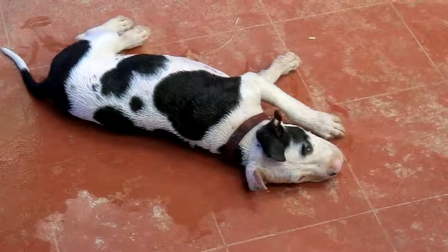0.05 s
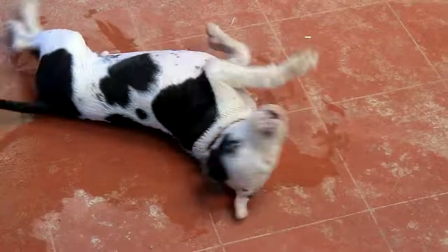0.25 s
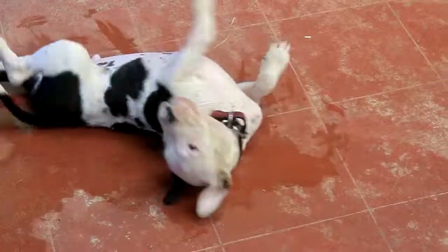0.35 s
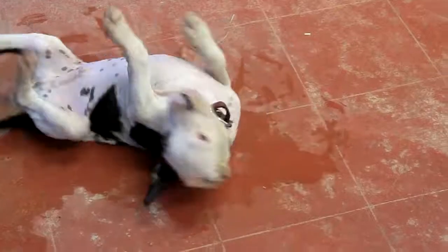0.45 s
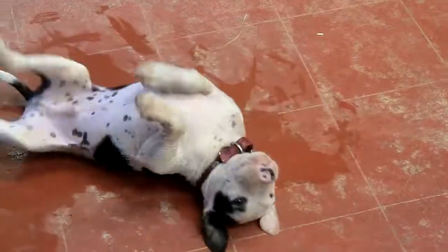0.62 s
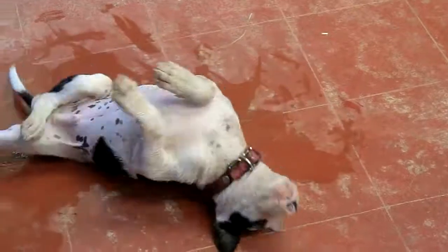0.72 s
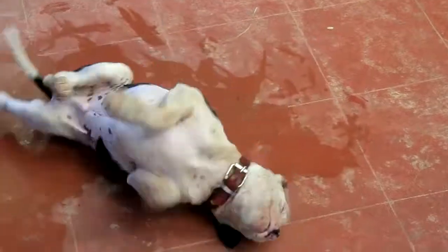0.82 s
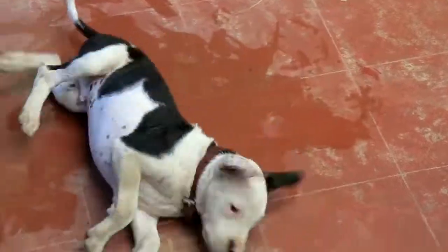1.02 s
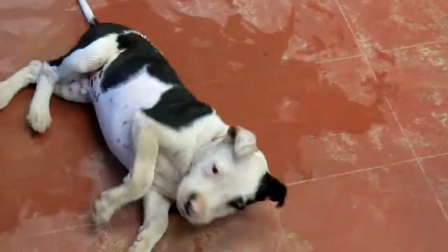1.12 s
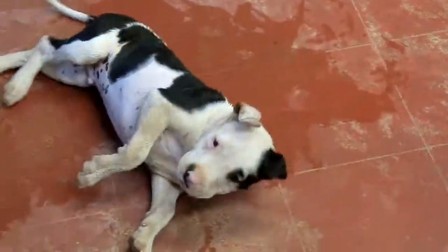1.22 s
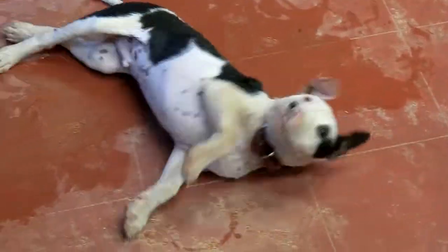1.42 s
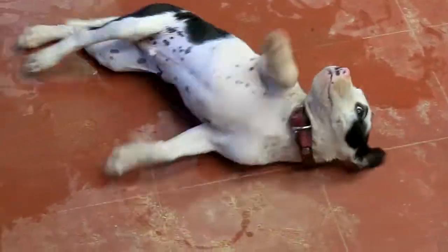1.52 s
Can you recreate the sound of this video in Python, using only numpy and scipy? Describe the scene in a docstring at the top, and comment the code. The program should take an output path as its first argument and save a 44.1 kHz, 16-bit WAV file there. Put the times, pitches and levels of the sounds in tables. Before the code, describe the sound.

A single rough bark, loud enough to make the microphone click, echoes indoors. A much quieter puppy grumble follows, rising into a small moan, as its coat brushes the tiled floor and its collar ticks over faint hiss.

```python
"""A dog gives one short, loud, rough and rasping bark that overloads the microphone with a brief click.
The hard-walled room throws it back and rings. Then a puppy rolling on the tiles grumbles softly:
uneven throat pulses ring its chest and muzzle, a low growl that breaks into a rattle and rises to a
small moan. Its coat brushes the floor, its collar ticks and its body thuds, over faint hiss and rumble."""
import sys
import numpy as np
from scipy import signal
from scipy.fft import rfft, irfft
from scipy.io import wavfile
from scipy.ndimage import uniform_filter1d

SR = 44100
rng = np.random.default_rng(int(sys.argv[2]) if len(sys.argv) > 2 else 0)


def log_audio(samples):
    """Write samples as a 16-bit WAV file to the path given in sys.argv[1]."""
    # one column per channel
    frames = np.atleast_2d(samples).T
    # limit to full scale, then quantise
    limited = np.clip(frames, -1, 1)
    pcm = np.round(limited * 32767).astype(np.int16)
    wavfile.write(sys.argv[1], SR, pcm)


N = 68355
T = np.arange(N) / SR


def from_db(db):
    """Decibels to gain."""
    return 10 ** (np.asarray(db) / 20)


def rms_one(x):
    """Scale to unit power."""
    return x / np.sqrt(np.mean(x ** 2) + 1e-20)


def in_time(rows):
    """Interpolate each column at every sample; the first column is time in seconds."""
    times_s, *columns = np.transpose(rows)
    return [np.interp(T, times_s, column) for column in columns]


def at_hz(points, hz):
    """Read a spectrum on a log-frequency axis."""
    points_hz, values = np.transpose(points)
    return np.interp(np.log(hz + 1e-9), np.log(points_hz), values)


def cut(x, hz, kind, order=2):
    """Butterworth filter."""
    sos = signal.butter(order, np.clip(hz, 10, .48 * SR), kind, fs=SR, output="sos")
    return signal.sosfilt(sos, x + 1e-18)


def noise(colour):
    """Noise of a given colour, rms 1."""
    gain = from_db(at_hz(colour, np.fft.rfftfreq(N, 1 / SR)))
    return rms_one(irfft(rfft(rng.standard_normal(N)) * gain, N))


def wobble(hz):
    """Random wavering up to a given rate, rms 1."""
    return rms_one(cut(rng.standard_normal(N), hz, "low"))


def decay(start_s, decay_s):
    """Envelope: instant attack, exponential fall."""
    return (T >= start_s) * np.exp(-np.abs(T - start_s) / decay_s)


def resonate(x, modes):
    """Parallel resonances with alternating signs."""
    out = 0
    for k, (hz, width_hz, db) in enumerate(modes):
        r = np.exp(-np.pi * width_hz / SR)
        feedback = [1, -2 * r * np.cos(2 * np.pi * hz / SR), r * r]
        out += (-1) ** k * from_db(db) * (1 - r * r) / 2 * signal.lfilter([1, 0, -1], feedback, x)
    return out


def moving_resonance(x, hz, width_hz):
    """One resonance whose centre glides, stepped in short blocks."""
    out, state = np.zeros(N), np.zeros(2)
    r = np.exp(-np.pi * width_hz / SR)
    for i in range(0, N, 128):
        block = slice(i, i + 128)
        feedback = [1, -2 * r * np.cos(2 * np.pi * hz[i] / SR), r * r]
        out[block], state = signal.lfilter([1, 0, -1], feedback, x[block], zi=state)
    return out * (1 - r * r) / 2


def background():
    """Hiss, louder before the bark than after, over low room rumble."""
    # Noise spectra. Each row: frequency in Hz, relative density in dB.
    hiss_colour = [(30, -12.5), (110, -3.5), (300, -12.5), (500, -4.5), (700, 4.5), (1400, -1),
                   (2500, -0.5), (4000, -5.5), (8000, -8), (15500, -11)]
    rumble_colour = [(25, -1), (60, -16), (130, -1.5), (400, -8), (900, -15), (3000, -40), (16000, -47)]
    # Hiss envelope. Each row: time in seconds, level in dB.
    hiss_curve = [(.110, -120), (.116, -56.5), (.135, -54.5), (.155, -50.5), (.185, -56.5), (.30, -59),
                  (.40, -72), (1.55, -69.5)]
    hiss_db, = in_time(hiss_curve)
    return from_db(hiss_db) * noise(hiss_colour) + from_db(-64) * noise(rumble_colour)


def bark():
    """A soft whine leaps to a loud, rough tone, rasping each cycle, pushes again and falls away."""
    # Voice contour. Each row: time in seconds, pitch in Hz, level in dB, roughness.
    contour = [(.200, 530, -61, 0.42), (.208, 565, -46, 0.37), (.224, 611, -42, 0.2),
               (.2350, 599.8, -26.5, 0.2), (.2392, 848, -7, 0.54), (.244, 855, -8, 0.65),
               (.251, 892.7, -15, 0.6), (.257, 861.7, -6, 0.1), (.262, 810.6, -11.5, 0.18),
               (.269, 785, -33.5, 1.1), (.279, 752.8, -32.5, 0.9), (.286, 818, -11.5, 0.1),
               (.294, 777.5, -19.5, 0.42), (.304, 697, -36, .5), (.325, 465.3, -48, .2),
               (.342, 310, -49, .1), (.385, 242, -51, 0.2)]
    # Throat and open mouth. Each row: frequency in Hz, harmonic gain in dB.
    mouth = [(280, -5), (560, 0.5), (850, -1.5), (1200, -11), (1650, -15.5), (2000, -14), (2450, -14.5),
             (2850, -27.5), (3500, -25.5), (4100, -33.5), (4800, -59.5), (15000, -53)]
    # Rasp spectrum. Each row: frequency in Hz, relative density in dB.
    rasp_colour = [(200, -53.5), (480, -33), (750, -2), (1100, 2), (1600, 3), (2000, -6.5), (2400, 5.5),
                   (2900, -10.5), (3800, -4.5), (4700, -35), (6800, -36), (8200, -33.5), (10000, -37.5),
                   (15000, -31)]
    jitter, rasp_db = 0.022, -2.5
    hz, db, rough = in_time(contour)
    phase = 2 * np.pi * np.cumsum(hz * (1 + jitter * rough * wobble(hz=500))) / SR
    tone = sum(from_db(at_hz(mouth, k * hz)) * np.cos(k * phase) for k in range(1, 13)) * np.sqrt(2)
    rasp = from_db(rasp_db) * rough * noise(rasp_colour) * (1 + 0.2 * np.cos(phase))
    voice = cut(from_db(db) * (tone + rasp), 258, "high", order=4)
    return voice * (T > contour[0][0]) * (T < contour[-1][0])


def room(x):
    """Two dull wall echoes and a diffuse ring that dies band by band."""
    # Wall echoes. Each row: delay in seconds, gain in dB.
    walls = [(.030, -18.5), (0.0453, -15.5)]
    # Diffuse ring. Each row: frequency in Hz, gain in dB, T60 in seconds.
    ring = [(150, -11, 0.65), (500, -8, .42), (756, -7.5, 0.82), (910, -8.5, 0.24), (1570, 1.5, 0.42),
            (2560, -9.5, .26), (4060, -9, 0.35), (8000, 4.5, .3), (15000, -5.5, .27)]
    gain_db, t60_s = np.array(ring)[:, :2], np.array(ring)[:, ::2]
    build_s, edges_hz = .012, np.geomspace(100, 17000, 14)
    white, bins_hz = rfft(rng.standard_normal(N)), np.fft.rfftfreq(N, 1 / SR)
    tail = 0
    for low, high in zip(edges_hz, edges_hz[1:]):
        hz = np.sqrt(low * high)
        envelope = from_db(-60 * T / at_hz(t60_s, hz)) * (1 - np.exp(-T / build_s))
        band = irfft(white * ((bins_hz >= low) & (bins_hz < high)), N) * envelope
        tail += from_db(at_hz(gain_db, hz)) * rms_one(band) * np.sqrt(2 * (high - low) / SR / N)
    dull = cut(x, 1200, "low")
    echoes = sum(from_db(db) * np.interp(T - delay_s, T, dull) for delay_s, db in walls)
    return echoes + signal.fftconvolve(x, tail)[:N]


def overload_click():
    """Microphone overload as the bark turns loud: a brief broadband noise burst."""
    # Click spectrum. Each row: frequency in Hz, relative density in dB.
    colour = [(30, 2), (170, 0), (350, -19.5), (900, -5), (5000, 1), (7500, -2), (9000, -10.5),
              (16000, -10)]
    peak_s, half_length_s = .2405, .0016
    return from_db(-27) * np.exp(-((T - peak_s) / half_length_s) ** 2 / 2) * noise(colour)


def growl():
    """Uneven pulses, strong and weak in turn, ring throat and chest and puff air through the muzzle."""
    # Puppy's voice. Each row: time in seconds, pitch in Hz, level in dB, roughness, weakening of every
    # second pulse (0-1), throat resonance in Hz, relative mouth opening in dB, brightness in dB.
    contour = [(.42, 118.8, -57, 0.41, 0.06, 470, 19.5, -8.5), (.485, 113.2, -50.5, 0.25, 0, 440, 8, -21),
               (.55, 98.28, -52.5, 0.6, 0.21, 303.4, -11.5, 5), (.70, 97.28, -55, 0.48, 0.01, 382, -13, 15),
               (.77, 91.7, -54.5, 0.43, .1, 343, -6, -20), (.80, 96.77, -62.5, 0.44, .2, 500, -14, 21),
               (.83, 104.9, -55, 0.29, 0.2, 572, -9.5, 11), (.88, 108.5, -51, 0.23, .1, 310.2, -0.5, 1),
               (.915, 118, -45.5, 0.64, 0.16, 500, 2.5, -15), (.97, 113.9, -51, 0.2, 0.83, 313, -4.5, 4),
               (1.06, 113.8, -53.5, 0.1, 0.93, 285, -4, 13), (1.165, 115.4, -56, 0.05, 0.6, 295, -2, 0.5),
               (1.185, 206.9, -53, 0.09, 0.17, 408.2, 2, 9), (1.212, 209, -53, 0, .02, 419.7, 10, -4),
               (1.24, 201.6, -46, 0.11, 0.6, 403.3, 5.5, -4.5), (1.268, 194.3, -52, .04, 0.03, 380, 5.5, 0),
               (1.295, 198, -53.5, 0.25, 1, 396, 11.5, -8.5), (1.33, 184.1, -49, 0.6, 0.7, 380, -2, 4),
               (1.365, 178, -55.5, 0.41, .5, 430, 11, -3.5), (1.40, 172.5, -50, 0.2, .3, 486, 7.5, 0),
               (1.49, 160.7, -60, 0.3, 0.15, 373, 3, -3.5), (1.55, 160, -95, 0.53, 0.1, 450, -35, 1)]
    # Resonance gliding with the jaw. Each row: time in seconds, centre in Hz.
    jaw_glide = [(.70, 2070), (.80, 2280), (.875, 3520), (.93, 4136), (1.01, 3950), (1.055, 2770),
                 (1.11, 2140), (1.27, 2046), (1.36, 3688), (1.41, 2500), (1.48, 2140)]
    # Body and airway resonances. Each row: centre in Hz, width in Hz, gain in dB.
    throat_modes = [(521.7, 150, -22.5)]
    chest_modes = [(103.66, 53, -8), (197.1, 45, -1.5)]
    lip_modes = [(792, 40, -7.5), (1040, 214, -12.5)]
    muzzle_modes = [(2120, 430, -23.5), (3270, 380, -25.5), (3890, 300, -28), (5130, 1500, -27.5)]
    jitter, puff_decay_s = 0.069, 0.0029
    hz, db, rough, weak, throat_hz, opening_db, bright_db = in_time(contour)
    jaw_hz, = in_time(jaw_glide)

    cycles = np.cumsum(hz * (1 + jitter * rough * wobble(hz=97))) / SR
    count = np.floor(cycles)
    alternation = 1 - np.clip(weak, 0, 1) * (count % 2)
    pulses = np.diff(count, prepend=0) * alternation * from_db(5 * rough * wobble(hz=150))
    air = rng.standard_normal(N) * np.exp(-2.5 * (cycles % 1)) * np.sqrt(5 * hz / SR)
    source = cut(pulses + from_db(3.5) * rough * air, 82.64, "high", order=3)
    puff_envelope = signal.lfilter([1], [1, -np.exp(-1 / (puff_decay_s * SR))], pulses + 1e-18)
    puffs = puff_envelope * rng.standard_normal(N) * np.sqrt(2 / (puff_decay_s * SR))
    airy = 0.63 * source + from_db(0.5) * np.sqrt(np.clip(rough + weak, 0, 1)) * puffs

    throat = moving_resonance(source, throat_hz, width_hz=122) - resonate(source, throat_modes)
    chest = cut(resonate(source, chest_modes) + throat, 588, "low", order=3)
    lips = cut(resonate(source, lip_modes), [754, 1400], "band")
    jaw = from_db(-20) * moving_resonance(airy, jaw_hz, width_hz=470)
    muzzle = cut(resonate(airy, muzzle_modes) + jaw, [1730, 6800], "band", order=3)
    voice = chest + from_db(opening_db - 8.5) * (lips + from_db(bright_db) * muzzle)
    chest_rms = np.sqrt(np.abs(uniform_filter1d(chest ** 2, size=1800)) + 1e-14)
    return from_db(db) * voice / chest_rms * (T > contour[0][0])


def coat():
    """Fur brushes the tiles in grainy swells."""
    # Each row: peak time in seconds, half length in seconds, band centre in Hz, level in dB.
    brushes = [(.46, 0.021, 9600, -67), (0.569, 0.1, 9060, -71.5), (0.715, 0.05, 9300, -79.5),
               (0.587, 0.047, 6560, -79.5), (0.882, 0.025, 3610, -65), (1.146, 0.067, 7600, -77),
               (1.33, .05, 11100, -75)]
    grain_db, half_band_octaves = 3, 0.18
    out = 0
    for peak_s, half_length_s, hz, db in brushes:
        grains = rng.standard_normal(N) * from_db(grain_db * wobble(hz=198.5))
        band_hz = hz * 2 ** (half_band_octaves * np.array([-1, 1]))
        swell = np.exp(-((T - peak_s) / half_length_s) ** 2 / 2)
        out += from_db(db) * swell * rms_one(cut(grains, band_hz, "band"))
    return out


def collar():
    """The collar ticks: short, bright noise bursts."""
    # Each row: start in seconds, level in dB.
    ticks = [(0.535, -72), (.870, -58.5), (0.881, -60)]
    # Tick spectrum. Each row: frequency in Hz, relative density in dB.
    colour = [(1500, -24), (4000, -16), (9000, 3), (16000, 2.5)]
    return sum(from_db(db) * decay(start_s, decay_s=0.004) * noise(colour) for start_s, db in ticks)


def thud():
    """A dull thud as the puppy flops over."""
    # Body on floor. Each row: start in seconds, level in dB.
    bumps = [(.555, -55)]
    # Thud spectrum. Each row: frequency in Hz, relative density in dB.
    colour = [(30, -8), (80, -4.5), (170, 3), (400, -27), (1500, -37), (16000, -70)]
    return sum(from_db(db) * decay(start_s, decay_s=0.116) for start_s, db in bumps) * noise(colour)


def scene():
    """Both voices excite the room; the other sounds stay dry. Mono."""
    start_s = .113
    dog, puppy = bark(), growl()
    reverb = room(dog + from_db(1) * puppy)
    mix = dog + overload_click() + puppy + reverb + coat() + collar() + thud() + background()
    return (mix * (T > start_s))[None]


def record(dry):
    """Microphone overload flattens the loudest peaks; a low-pass cuts the top."""
    clip_level, stopband_hz = .71, 16800
    lowpass = signal.cheby2(12, 60, stopband_hz, fs=SR, output="sos")
    return signal.sosfilt(lowpass, np.clip(dry, -clip_level, clip_level))


dry = scene()
out = record(dry)
log_audio(out)
```